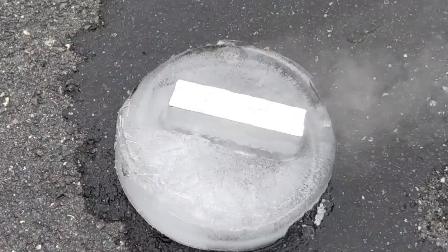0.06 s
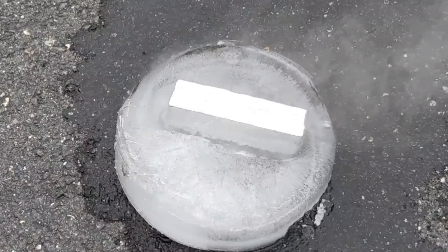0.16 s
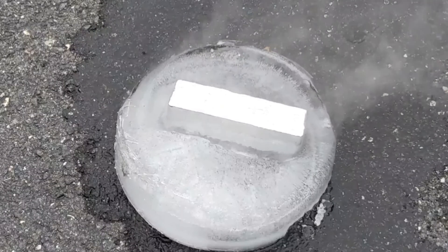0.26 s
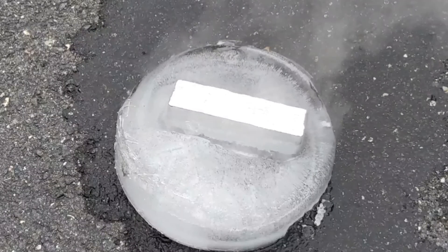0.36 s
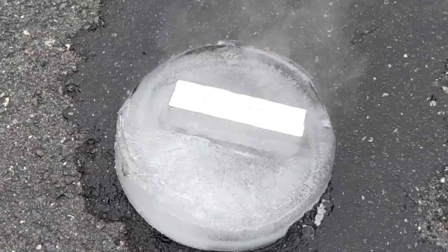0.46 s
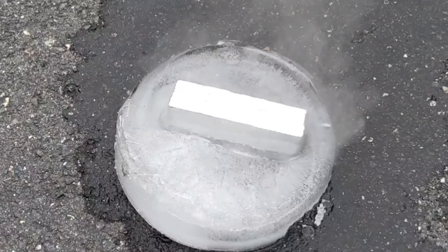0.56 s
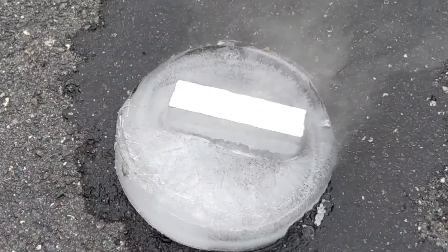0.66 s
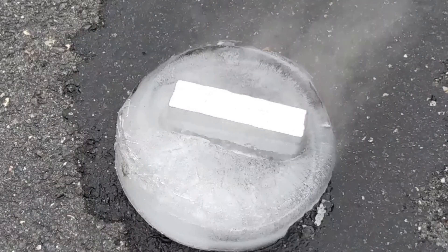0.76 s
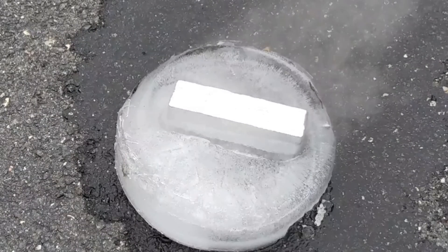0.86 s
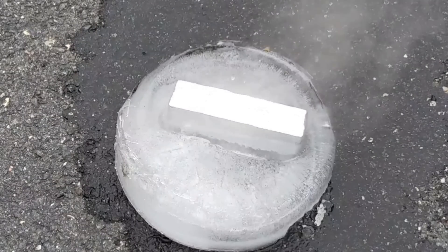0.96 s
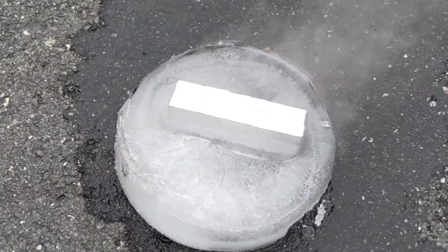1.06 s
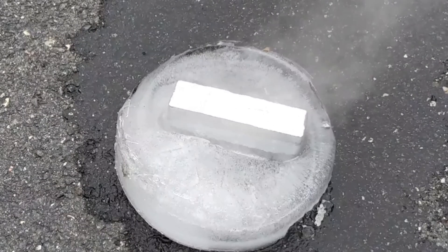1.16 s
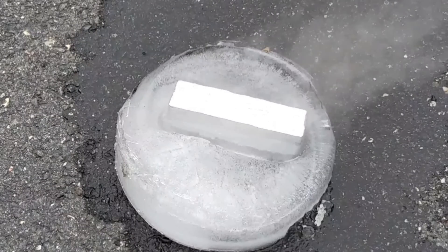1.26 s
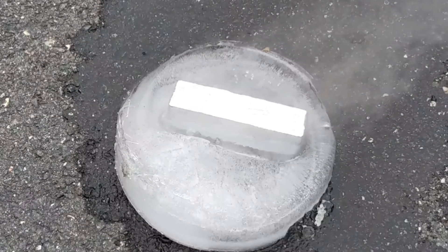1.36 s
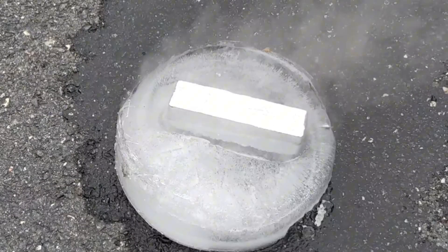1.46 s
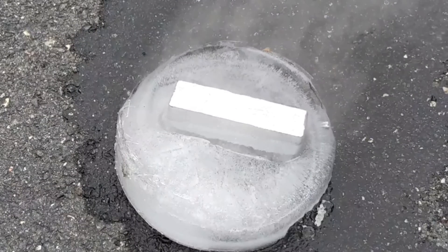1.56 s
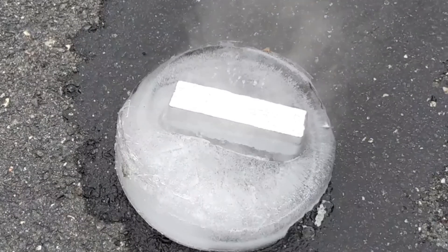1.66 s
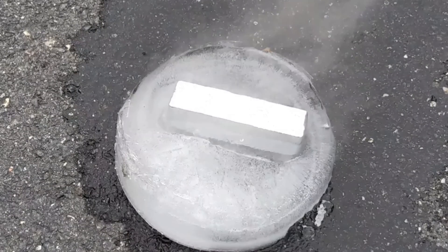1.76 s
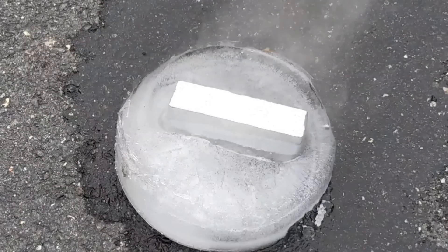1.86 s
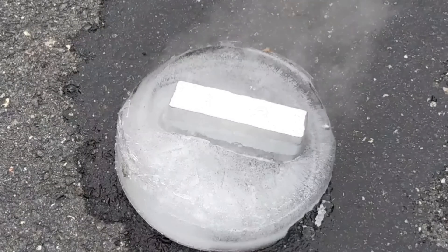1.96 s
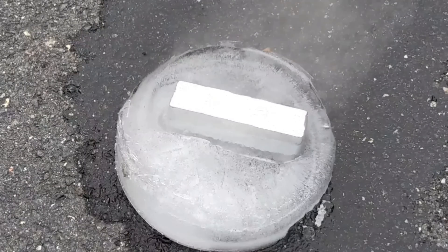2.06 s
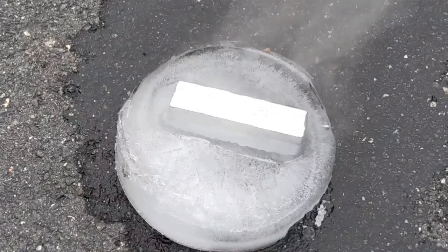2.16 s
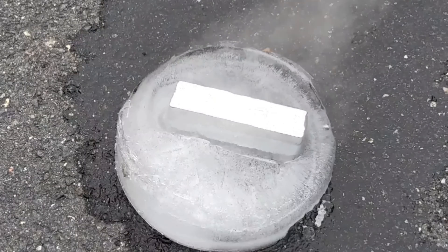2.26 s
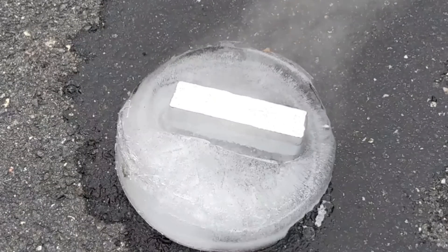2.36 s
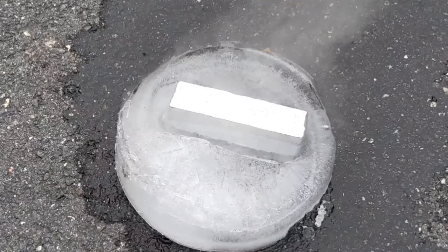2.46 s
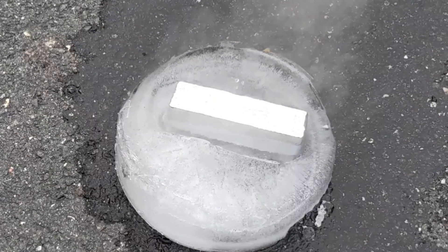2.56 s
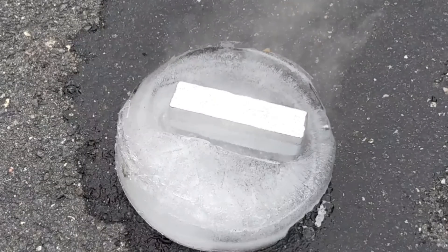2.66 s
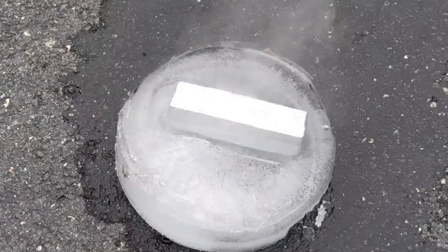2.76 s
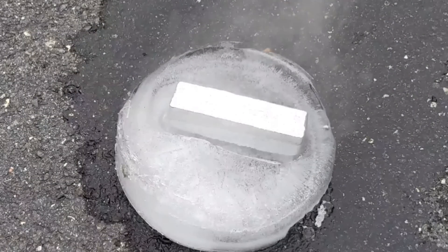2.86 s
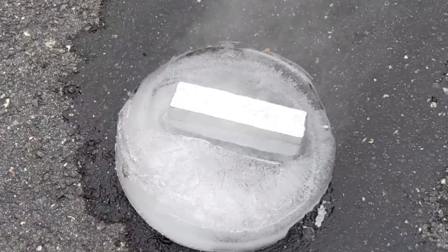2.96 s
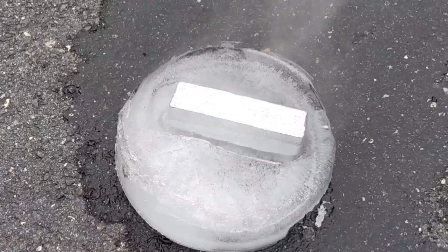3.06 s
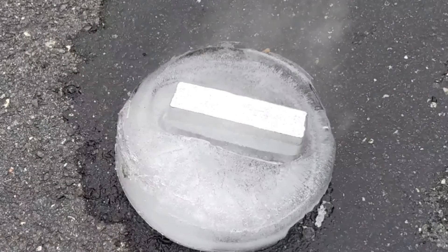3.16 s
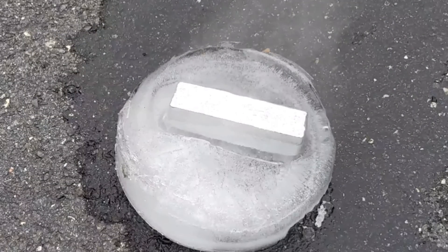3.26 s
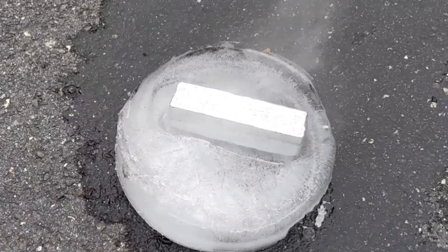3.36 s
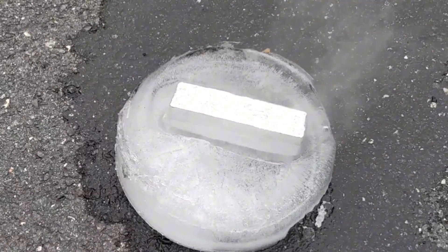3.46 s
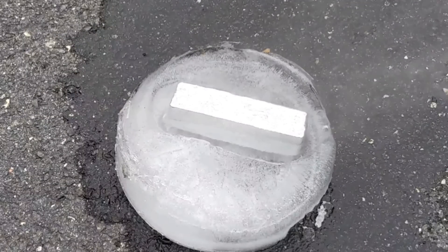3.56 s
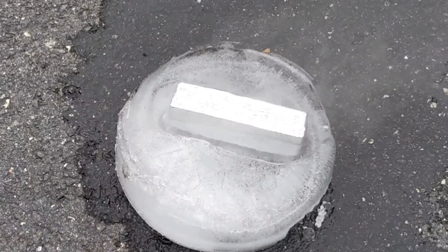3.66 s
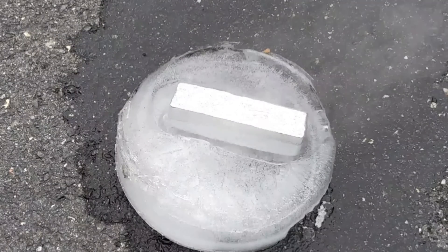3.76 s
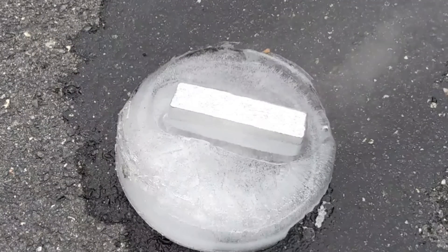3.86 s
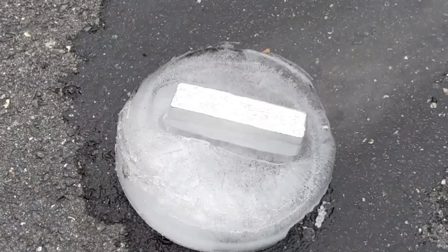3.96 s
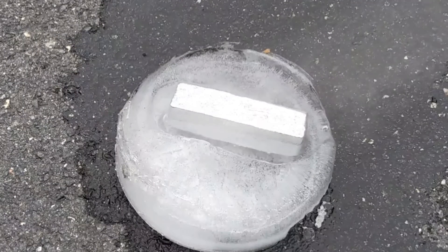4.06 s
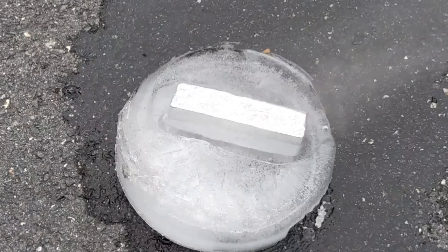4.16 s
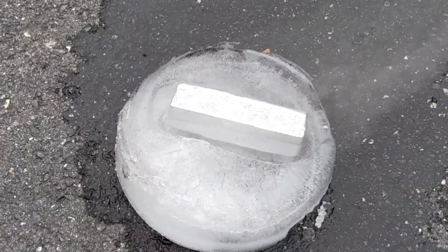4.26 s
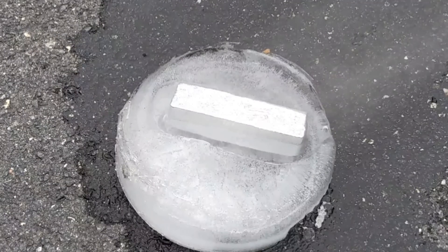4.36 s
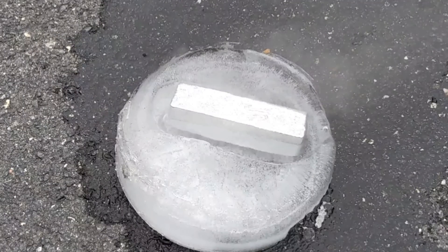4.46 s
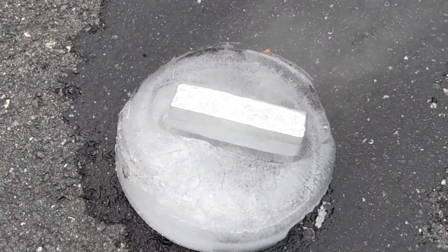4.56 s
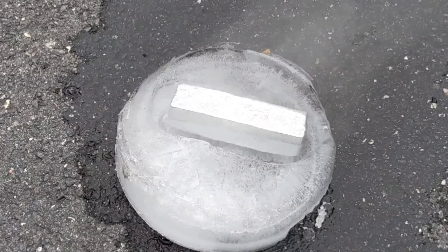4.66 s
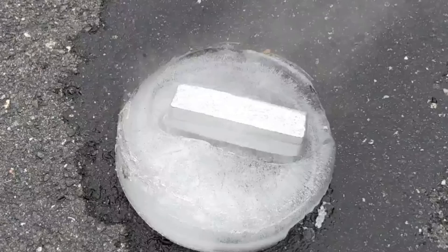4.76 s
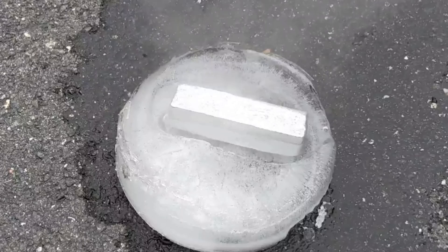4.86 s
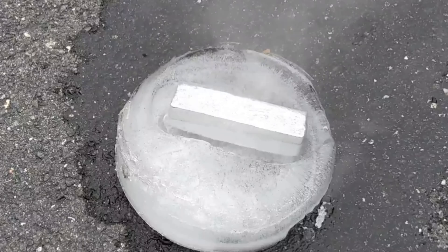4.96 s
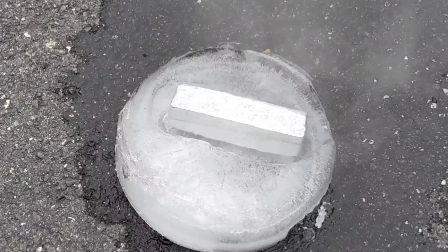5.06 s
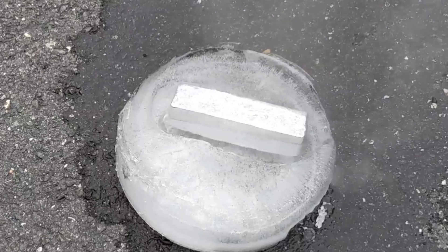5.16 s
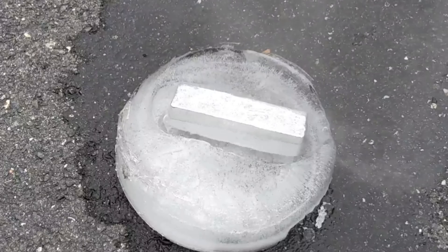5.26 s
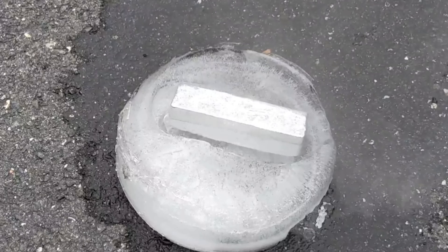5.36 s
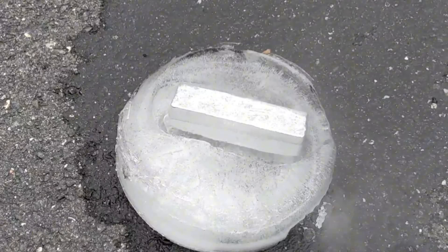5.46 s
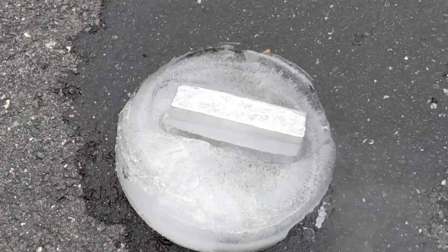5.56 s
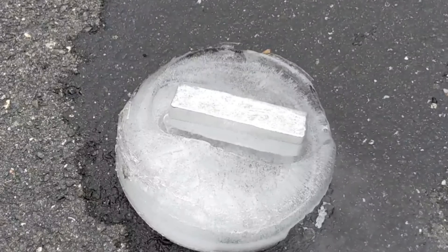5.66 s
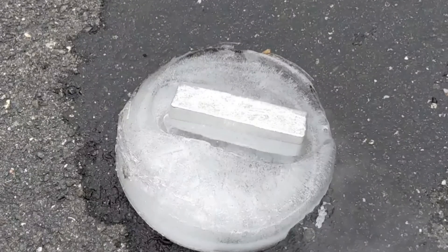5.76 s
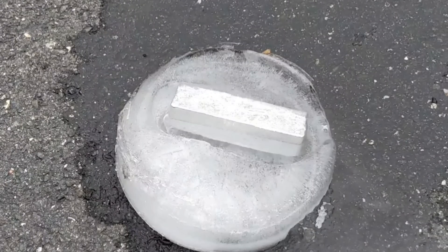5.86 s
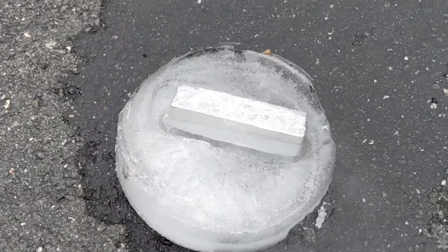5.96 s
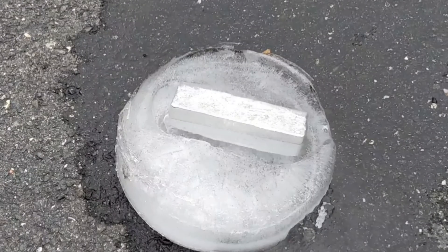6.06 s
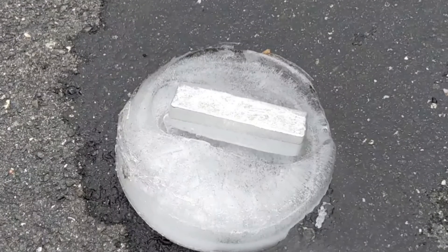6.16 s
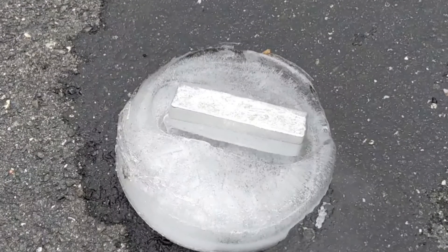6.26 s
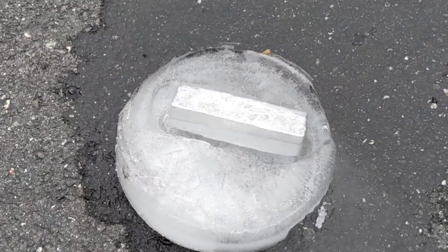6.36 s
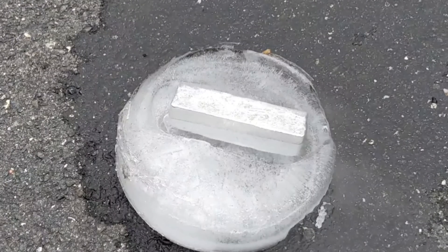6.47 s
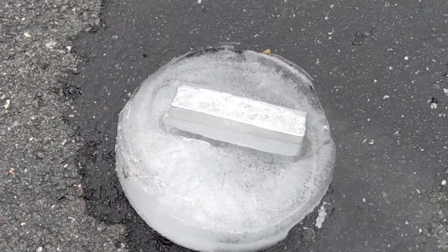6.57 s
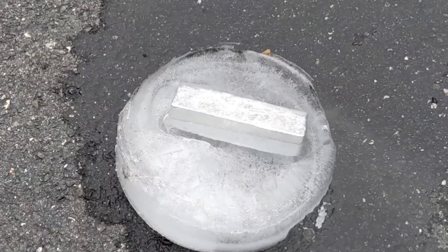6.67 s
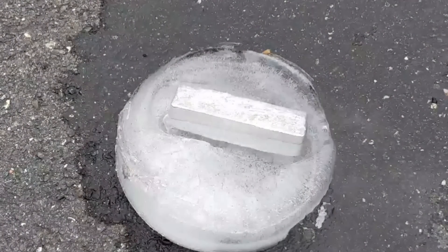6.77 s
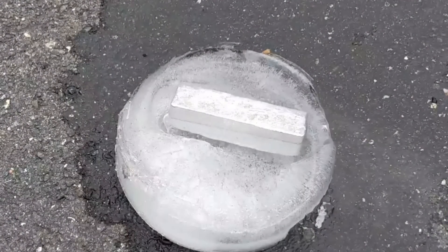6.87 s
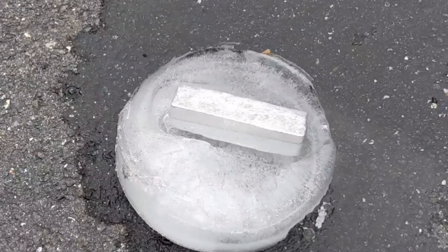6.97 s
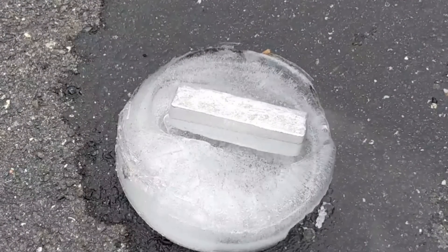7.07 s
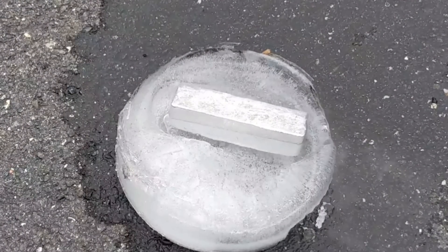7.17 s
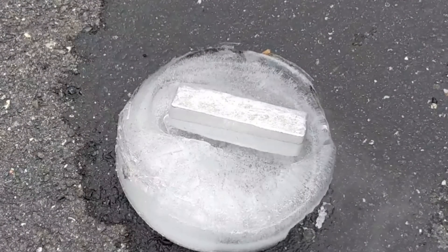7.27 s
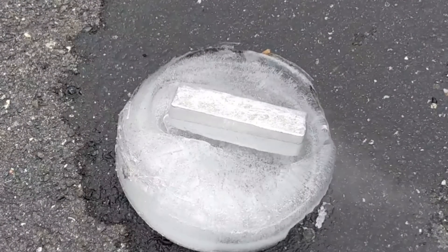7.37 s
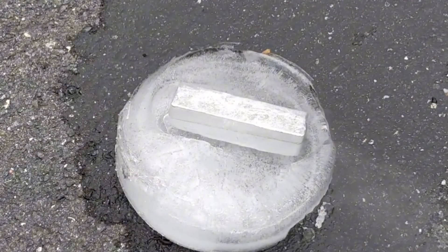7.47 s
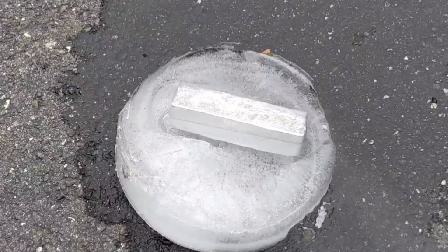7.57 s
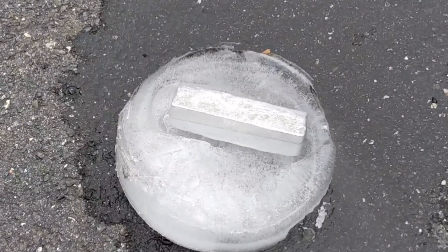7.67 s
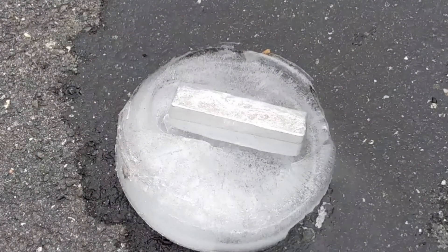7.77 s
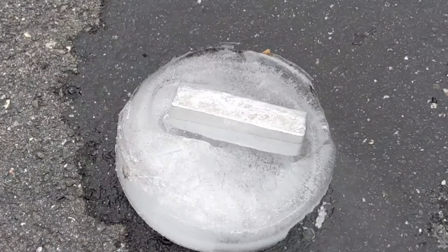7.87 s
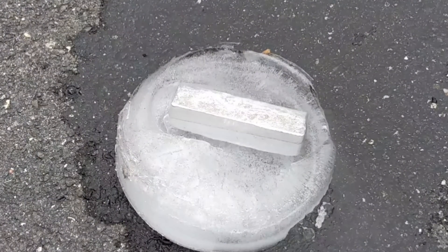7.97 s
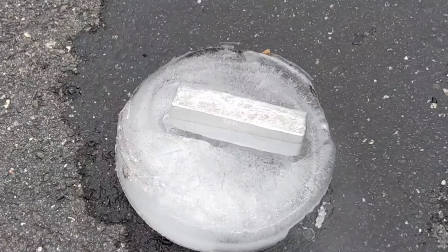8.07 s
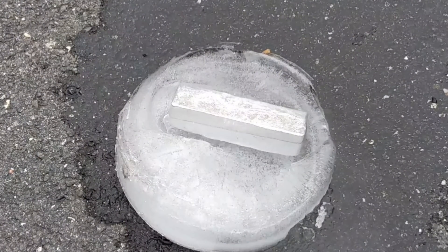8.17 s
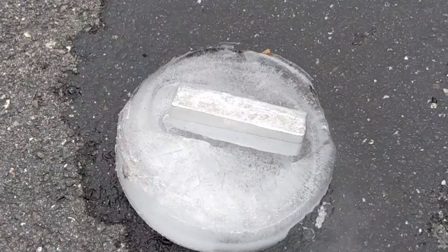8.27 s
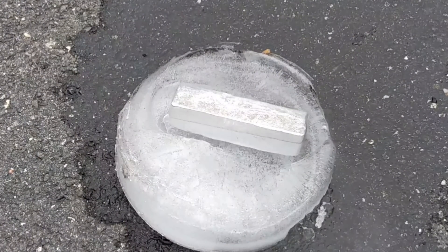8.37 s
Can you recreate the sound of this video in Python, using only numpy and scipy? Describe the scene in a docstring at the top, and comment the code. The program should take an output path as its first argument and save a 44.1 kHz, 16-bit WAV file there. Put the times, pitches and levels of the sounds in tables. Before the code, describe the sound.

From the start, a hot metal ingot sizzles on a block of ice outdoors: a dense, bright, finely sputtering hiss of tiny steam bursts. It is strongest for the first second, then fades gradually, clearly softer by 4 seconds and very faint by 8. A thin, high hiss comes forward from about 4.5 to 6.5 seconds, then sinks away too. A breeze rumbles on the microphone throughout, with short, soft thuds of wind, mostly on the right, notably around 0.6, 3 and 4.8 seconds. From 6 seconds the gusts hit both sides and stand out over the dying sizzle. Three gusts, at about 4.8, 6.8 and 7.2 seconds, each bring a brief swell of broad hiss. Behind it all lie faint open air and a soft low drone that recedes in the second half.

```python
"""A sputtering hiss: a freshly cast, very hot metal ingot lies on a block of ice outdoors.
It boils off the meltwater under it, and countless tiny bursts of steam merge into one sizzle.
As the metal cools the sizzle dies away, its low boil, steam and fine spray fading roughly together.
A breeze rumbles on the microphone's two openings (ports); three gusts come with a brief swell of hiss.
A thin high hiss, a soft low drone and faint open air lie behind it all."""
import sys
import numpy as np
from scipy import signal
from scipy.fft import rfft, irfft, next_fast_len
from scipy.io import wavfile
from scipy.ndimage import uniform_filter1d

SR = 44100
rng = np.random.default_rng(int(sys.argv[2]) if len(sys.argv) > 2 else 0)


def master_out(mix):
    """Clip the mix to full scale and print it as 16-bit PCM to the path in sys.argv[1]."""
    frames = np.transpose(np.atleast_2d(mix))
    ceiling = np.clip(frames, -1, 1)
    pcm = np.round(ceiling * 32767).astype(np.int16)
    wavfile.write(sys.argv[1], SR, pcm)


N = 371306
TIME = np.arange(N) / SR
FFT_SIZE = next_fast_len(N + 4096)
HZ = np.maximum(np.arange(FFT_SIZE // 2 + 1) * SR / FFT_SIZE, 1)

# Colour (how strong each pitch is) of the distant outdoors: pitch_hz, gain_db
OUTDOOR_COLOUR = [(30, 7), (100, -13), (145, 1), (190, -5.5), (300, -13), (500, -14), (1000, -11),
                  (2000, -33), (8000, -47)]
# A low drone that sinks away: time_s, level_db
DRONE_LEVELS = [(0, -62), (2, -55.5), (3.7, -60), (4.3, -58), (5.1, -65.5), (5.7, -64.5), (8.42, -73)]
# Colour of the drone: pitch_hz, gain_db
HUM_COLOUR = [(90, -23), (122, -2), (143, -1), (175, -4.5), (260, -3), (360, -11.5), (560, -11), (750, -9),
              (1200, -22.5)]
# The breeze between gusts: time_s, left_db, right_db
BREEZE_LEVELS = [(0, -49, -47.5), (0.92, -54, -46), (1.05, -64.1, -60), (1.6, -60.6, -51),
                 (2.3, -57, -46.5), (3.4, -61, -46.5), (3.7, -56, -52.5), (4.2, -64, -44),
                 (5.2, -57.5, -49.5), (5.8, -54, -53), (6.6, -51, -45.5), (7.4, -47, -52),
                 (8.42, -57.5, -52)]
# Gusts that each hit one port: peak_s, length_s, rumble_db, thud_db, port
GUST_HITS = [(0.105, 0.026, -42.5, -41, "left"), (0.366, 0.017, -46, -42, "right"),
             (0.62, 0.042, -36, -43, "right"), (0.868, 0.042, -41, -44, "right"),
             (1.647, 0.058, -50, -44, "right"), (2.16, 0.045, -45, -51.5, "right"),
             (2.99, 0.056, -36.5, -38.5, "right"), (3.435, 0.024, -54, -46.5, "right"),
             (4.046, 0.032, -41, -52, "right"), (4.315, 0.027, -50, -50, "right"),
             (4.491, 0.031, -41, -48.5, "right"), (4.675, 0.12, -44.5, -52.5, "right"),
             (4.815, 0.028, -38, -34, "right"), (4.976, 0.065, -39, -43, "right"),
             (5.402, 0.052, -41, -48, "right"), (6.053, 0.058, -38, -64, "left"),
             (6.41, 0.049, -60, -53, "left"), (6.66, 0.034, -43, -48, "right"),
             (6.695, 0.046, -39.5, -57, "left"), (6.808, 0.015, -32, -38, "right"),
             (7.062, 0.025, -39, -48, "right"), (7.124, 0.052, -42, -48, "left"),
             (7.283, 0.097, -36, -35, "left"), (7.686, 0.02, -38, -64, "right"),
             (8.063, 0.037, -39.5, -55, "left"), (8.21, 0.014, -37, -56, "right")]
# Colour of the wind's rumble: pitch_hz, gain_db
RUMBLE_COLOUR = [(12, -6.5), (30, 4.5), (55, -1), (85, -7), (120, -17.5), (180, -43), (300, -50),
                 (600, -68)]
# Colour of the eddies, small swirls of air: pitch_hz, gain_db
EDDY_COLOUR = [(40, -4), (90, 0), (150, 1.5), (210, -7), (300, -21.5), (450, -31), (900, -36), (2500, -65)]
# Brief swells of broad hiss during three gusts: start_s, hold_s, level_db
HISS_SWELLS = [(4.808, 0.022, -56), (6.79, 0.034, -52.5), (7.208, 0.115, -53)]
# Colour of those swells: pitch_hz, gain_db
SWELL_COLOUR = [(200, -16), (450, -1), (700, -0.5), (1700, 4.5), (2600, -2.5), (5000, -4), (7000, -16),
                (14000, -30)]
# A thin hiss that comes forward as the boil fades: time_s, level_db
THIN_HISS_LEVELS = [(0, -73), (3.8, -65), (4.8, -58), (5.6, -58), (6.6, -60), (7.3, -66.5), (8.42, -75.5)]
# Colour of the thin hiss: pitch_hz, gain_db
THIN_HISS_COLOUR = [(4500, -26), (5300, -9), (5700, 2), (6800, 2), (7300, 0), (8500, -30)]
# The boiling fades as the metal cools: time_s, boil_db, steam_db, spray_db
BOILING_LEVELS = [(0, -39.5, -39, -37.5), (1.1, -40, -39.5, -37.5), (2.2, -43, -44.5, -40.5),
                  (2.55, -43, -45, -43), (2.75, -43, -47.5, -45.5), (3.25, -45, -47.5, -47.5),
                  (4.1, -49.5, -51.5, -49.5), (5.05, -51.0, -54, -52), (5.55, -56.5, -59, -54),
                  (6.75, -60.5, -62, -56.7), (7.6, -64.5, -65.5, -63), (8.0, -67, -68.5, -68),
                  (8.42, -68.5, -69.5, -68.5)]
# Colour of the sizzle: pitch_hz, gain_db
SIZZLE_COLOUR = [(100, -22), (150, -11), (230, -11), (330, -14), (480, -11), (640, -14), (850, -6.5),
                 (1500, 0.5), (1950, 0), (2600, -8), (6000, -8), (9000, 4.5), (14300, 2), (15300, -4)]
# Pitches the left port boosts or weakens: pitch_hz, width_hz, gain_db
LEFT_RESONANCES = [(1300, 200, -1.5), (3440, 1450, 10), (5160, 1900, 1), (7730, 2300, 9.5),
                   (8900, 700, -2.5), (10160, 1600, 5), (11740, 3500, -13), (14590, 2300, -8.5)]
# The same for the right port: pitch_hz, width_hz, gain_db
RIGHT_RESONANCES = [(940, 220, 1.5), (3170, 730, 5), (3520, 160, -1.5), (4874, 1270, 14), (7040, 300, 1),
                    (7130, 980, -1), (8740, 2150, 6), (9900, 990, -6), (11170, 1840, 9)]
# How alike the two ports sound: pitch_hz, likeness_0_to_1, left_lead_radians
PORT_LIKENESS = [(400.0, 0.85, -0.02), (900.0, 0.8, -0.1), (1400.0, 0.91, -0.2), (1850.0, 0.96, -0.08),
                 (2600.0, 0.62, -0.67), (3600.0, 0.51, -1.38), (3900.0, 0.62, -2.75), (4600.0, 0.67, -2.62),
                 (5200.0, 0.64, -1.25), (6050.0, 0.42, -0.45), (6350.0, 0.23, -2.12), (7000.0, 0.64, -2.24),
                 (7550.0, 0.14, -2.66), (7950.0, 0.5, -4.72), (9250.0, 0.53, -3.26), (10400.0, 0.42, -5.46),
                 (12000.0, 0.2, -3.5), (14500.0, 0.17, -4.2)]


def from_db(db):
    """Turn decibels into a number to multiply by."""
    return 10 ** (np.asarray(db) / 20)


def rms(x):
    """The average strength of a sound (root mean square)."""
    return np.sqrt(np.mean(x ** 2) + 1e-20)


def in_time(rows):
    """Join a table's points into curves over time."""
    time_s, *columns = np.transpose(rows)
    return [np.interp(TIME, time_s, column) for column in columns]


def in_frequency(rows):
    """Join a table's points into curves over pitch."""
    hz, *columns = np.transpose(rows)
    return [np.interp(np.log(HZ), np.log(hz), column) for column in columns]


def filtered(x, response):
    """Give each pitch in a sound its own gain."""
    return irfft(rfft(x, FFT_SIZE) * response, FFT_SIZE)[..., :N]


def below(hz, order):
    """Gains that keep the pitches below hz; a higher order cuts more sharply."""
    return 1 / np.sqrt(1 + (HZ / hz) ** (2 * order))


def drift(rate_hz):
    """A slow random wobble with a typical size of 1."""
    step, warm_up = 40, 2000
    memory = np.exp(-2 * np.pi * rate_hz * step / SR)
    noise = rng.standard_normal(N // step + warm_up + 2)
    slow = signal.lfilter([1], [1, -2 * memory, memory ** 2], noise)[warm_up:]
    return np.interp(np.arange(N) / step, np.arange(len(slow)), slow / rms(slow))


def air_noise(colour):
    """Two unrelated noises of one colour, at strength 1."""
    noise = filtered(rng.standard_normal((2, N)), from_db(in_frequency(colour)[0]))
    return noise / rms(noise)


def evened(x, seconds):
    """Smooth out the chance swells in a noise."""
    power = uniform_filter1d(x ** 2, max(int(seconds * SR), 2), axis=-1)
    return x / np.sqrt(power + 1e-9)


def swell(peak_s, length_s, db):
    """A bell-shaped rise and fall in loudness."""
    return from_db(db) * np.exp(-2 * ((TIME - peak_s) / length_s) ** 2)


def port_colour(resonances):
    """A microphone port boosts some pitches and weakens others."""
    return from_db(sum(db / (1 + (2 * (HZ - hz) / width) ** 2) for hz, width, db in resonances))


def at_ports(direct, scattered, colour):
    """Both ports share the direct sound, out of step; scattered sound on the left makes them differ."""
    alike, lead = in_frequency(PORT_LIKENESS)
    source = from_db(in_frequency(colour)[0])
    left_gain = source * port_colour(LEFT_RESONANCES) * below(hz=14800, order=100)
    left = filtered(direct, left_gain * alike * np.exp(1j * lead))
    left += filtered(scattered, left_gain * np.sqrt(1 - alike ** 2))
    right = filtered(direct, source * port_colour(RIGHT_RESONANCES))
    return np.array([left, right])


def outdoors(gain_db, width):
    """Faint, steady noise from far away, leaning to the middle."""
    middle, side = air_noise(OUTDOOR_COLOUR)
    return from_db(gain_db) * np.array([middle + width * side, middle - width * side])


def drone():
    """A soft low drone, the same in both ears."""
    return air_noise(HUM_COLOUR)[0] * from_db(in_time(DRONE_LEVELS)[0])


def wind(waver_db, waver_hz, eddy_db, eddy_growth):
    """Moving air rumbles and swirls at each port; a gust is a swell of rumble around a brighter thud."""
    breeze_db = np.array([level_db + waver_db * drift(waver_hz) for level_db in in_time(BREEZE_LEVELS)])
    rumble_gain = from_db(breeze_db - 0.5)   # a slight lull between gusts
    eddy_gain = from_db(eddy_db + eddy_growth * (breeze_db - breeze_db.mean()))
    for peak_s, length_s, rumble_db, thud_db, port in GUST_HITS:
        side = ["left", "right"].index(port)
        gust = swell(peak_s, 1.7 * length_s, rumble_db)   # the rumble outlasts the thud
        rumble_gain[side] = np.hypot(rumble_gain[side], gust)
        eddy_gain[side] += swell(peak_s, length_s, thud_db)
    rumble = evened(air_noise(RUMBLE_COLOUR), seconds=0.061)
    eddies = evened(air_noise(EDDY_COLOUR), seconds=0.018)
    return rumble_gain * rumble + eddy_gain * eddies


def hiss_swells(rise_s, fade_db_per_s):
    """Brief swells of broad hiss during three gusts: each sets in quickly, holds and dies away."""
    hiss = at_ports(*rng.standard_normal((2, N)), SWELL_COLOUR)
    gain = 0
    for start_s, hold_s, level_db in HISS_SWELLS:
        rise = np.clip((TIME - start_s) / rise_s, 0, 1)
        fade_db = fade_db_per_s * np.maximum(TIME - start_s - hold_s, 0)
        gain += rise * from_db(level_db - fade_db)
    return hiss / rms(hiss) * gain


def thin_hiss():
    """A narrow, high hiss that comes forward as the boil fades."""
    hiss = at_ports(*rng.standard_normal((2, N)), THIN_HISS_COLOUR)
    return hiss / rms(hiss) * from_db(in_time(THIN_HISS_LEVELS)[0])


def steam_bursts(per_s, spread_db, jet_gain):
    """Pockets of steam burst at random, most tiny, a few larger, over a smooth jet of steam."""
    sizes = from_db(spread_db * np.minimum(rng.exponential(1, N), 4))
    signs = rng.choice([-1, 1], N)
    bursting = rng.random(N) < per_s / SR
    clicks = sizes * signs * bursting / np.sqrt(per_s)
    return clicks / rms(clicks) + jet_gain * rng.standard_normal(N)


def sizzle(base_per_s, hot_extra_per_s, sputter_db, sputter_hz, flicker_db, flicker_hz):
    """Hot metal boils meltwater; as it cools, the bursts thin out and the steam escapes more evenly."""
    boil_db, steam_db, spray_db = in_time(BOILING_LEVELS)
    heat = from_db(steam_db - steam_db.max())   # 1 at the hottest, falling towards 0
    direct = steam_bursts(base_per_s + hot_extra_per_s * heat, spread_db=2.5, jet_gain=0.96)
    scattered = rng.standard_normal(N) * rms(direct)
    hiss = at_ports(direct, scattered, SIZZLE_COLOUR)
    lows = below(hz=3900, order=10) ** 2
    lows_and_mids = below(hz=6500, order=8) ** 2
    shared_db = sputter_db * drift(sputter_hz)   # all three layers sputter together
    uneven_db = flicker_db + 0.53 * heat   # each also flickers alone, more when hot
    mix = 0
    for band, level_db in [(lows, boil_db), (lows_and_mids - lows, steam_db), (1 - lows_and_mids, spray_db)]:
        layer = filtered(hiss, band)
        gain = from_db(level_db + shared_db + uneven_db * drift(flicker_hz))
        mix += layer / rms(layer.mean(axis=0)) * gain
    return mix


def scene():
    """The ingot sizzles in the breeze and the open air."""
    ingot = sizzle(base_per_s=12000, hot_extra_per_s=18000,
                   sputter_db=0.19, sputter_hz=16, flicker_db=0.47, flicker_hz=18)
    breeze = wind(waver_db=3.5, waver_hz=9.7, eddy_db=-67.0, eddy_growth=1.22)
    ingot += thin_hiss()
    swells = hiss_swells(rise_s=0.016, fade_db_per_s=170)
    return ingot + breeze + swells + drone() + outdoors(gain_db=-66, width=0.82)


def record(dry):
    """Cut off the very highest pitches sharply."""
    return filtered(dry, below(hz=15850, order=250))


dry = scene()
out = record(dry)
master_out(out)
```